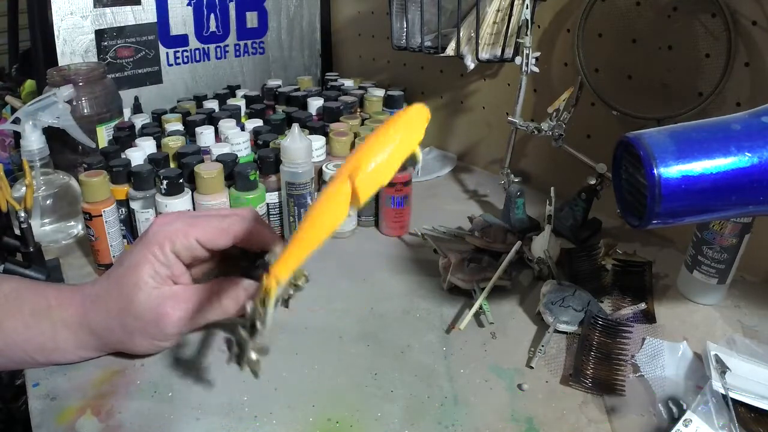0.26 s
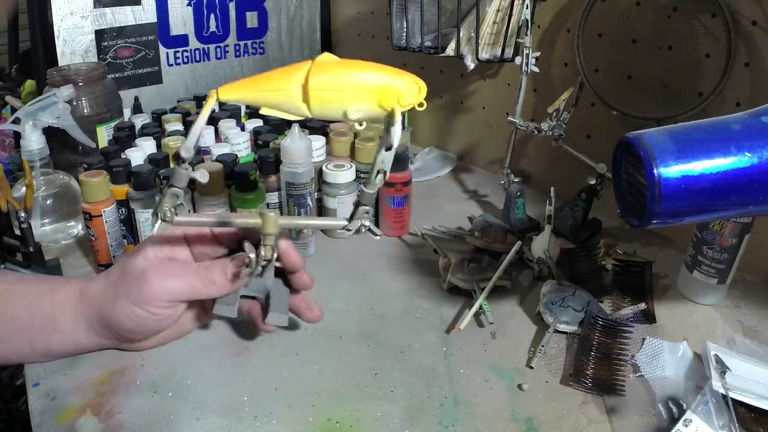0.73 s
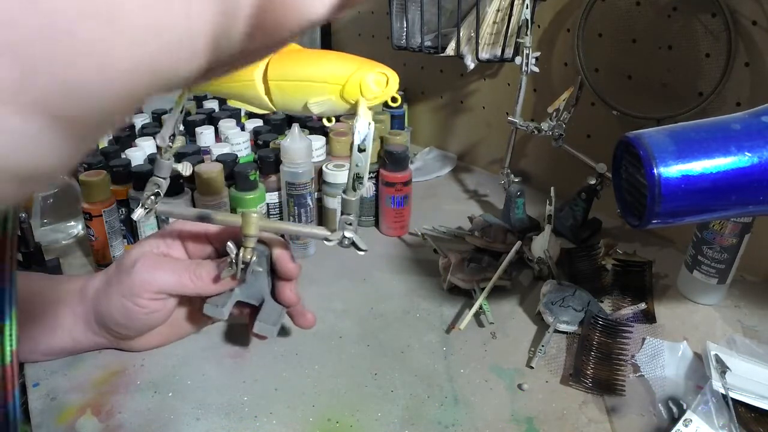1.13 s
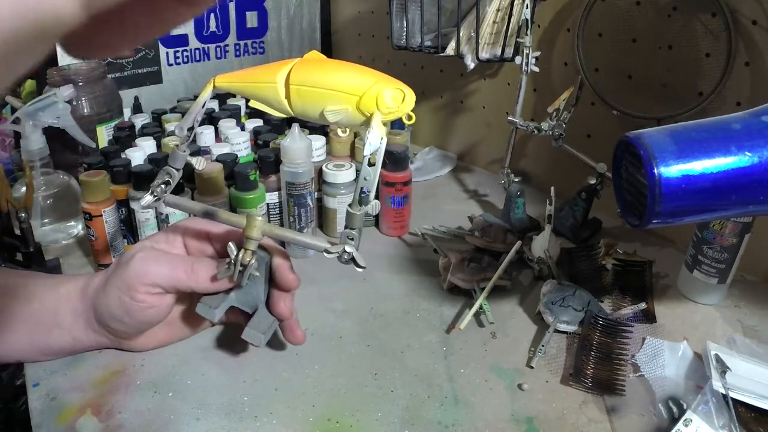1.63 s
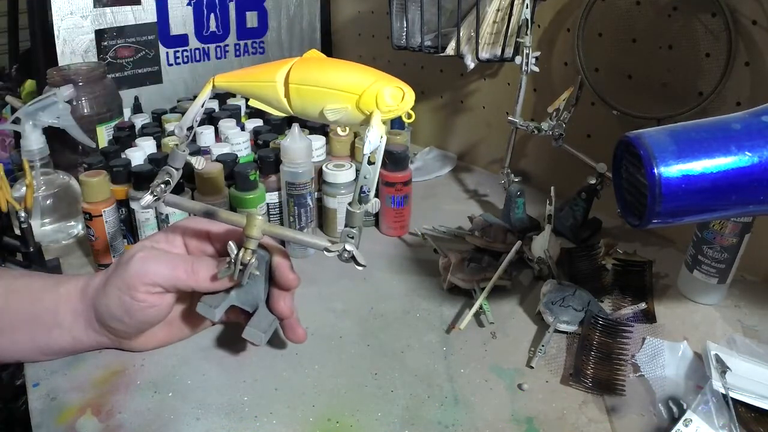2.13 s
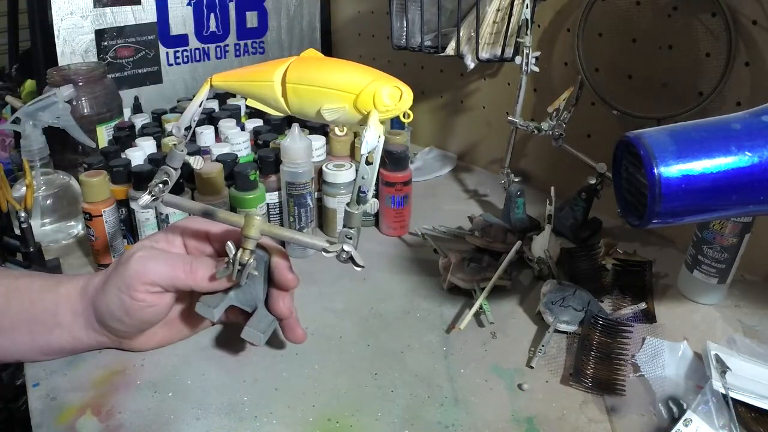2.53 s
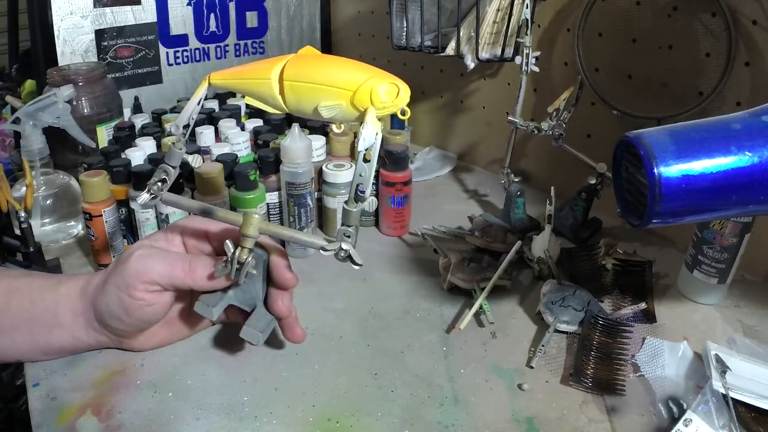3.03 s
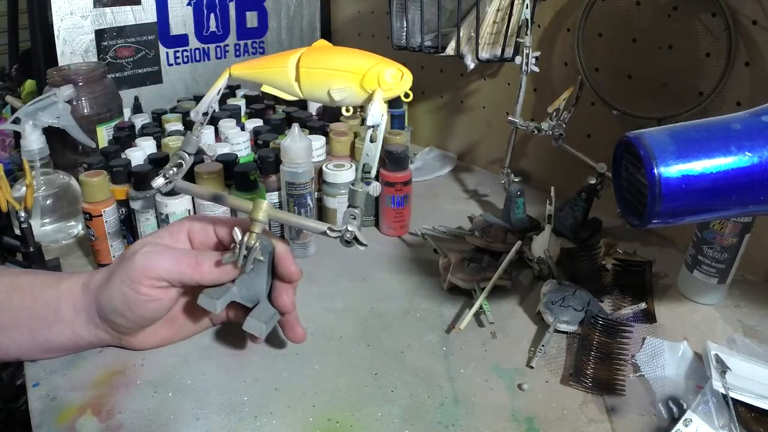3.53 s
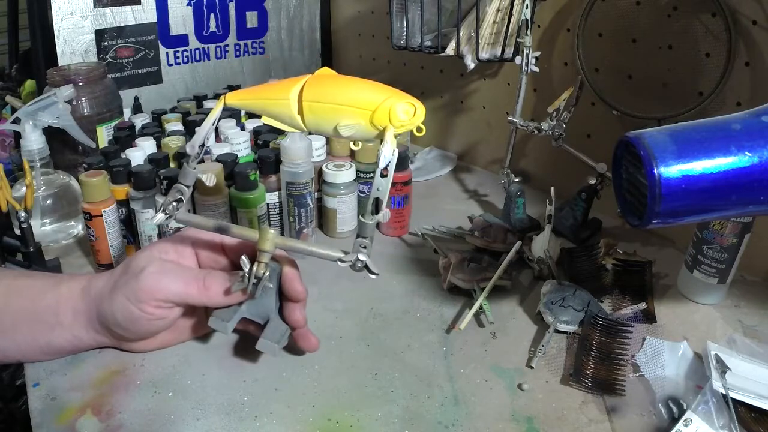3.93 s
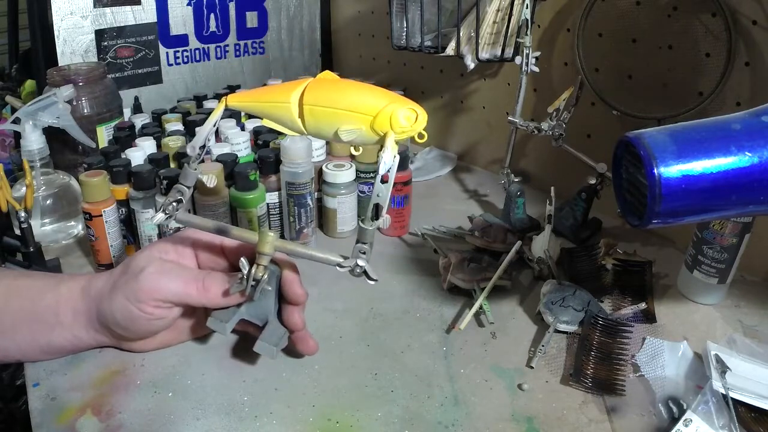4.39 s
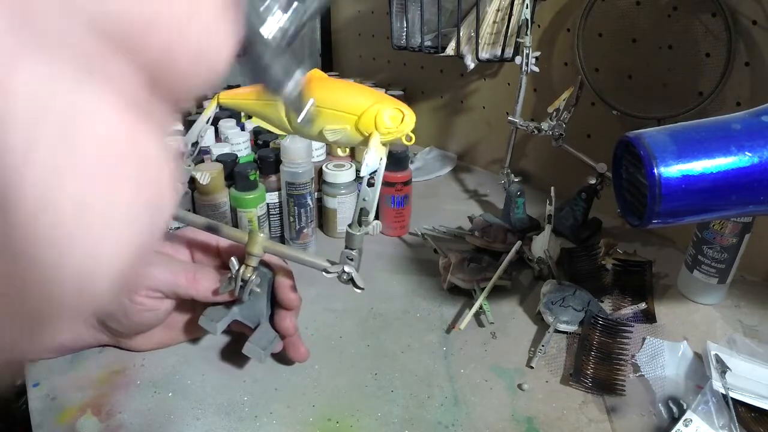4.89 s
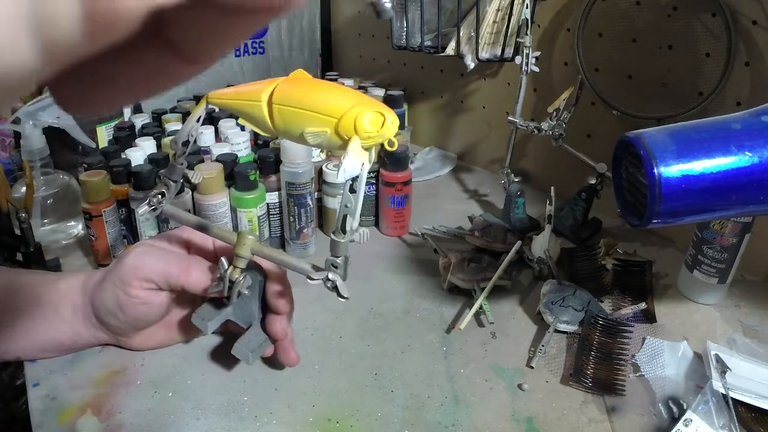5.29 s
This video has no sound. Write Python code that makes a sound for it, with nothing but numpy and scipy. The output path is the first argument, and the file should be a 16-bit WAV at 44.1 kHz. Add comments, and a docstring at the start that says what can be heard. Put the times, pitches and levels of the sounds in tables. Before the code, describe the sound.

Bright, sputtering paint spray starts and stops sharply in a small room, with metallic clamp clicks and brief rough whooshes.

```python
"""The last instant of a spray burst and the click of its trigger, then three more airbrush bursts over a workbench.
Air is shaped noise; paint adds brighter noise, pulsed by spits that start fast and settle near 90 a second.
The trigger snaps shut after the first three bursts as a burst of noise and ringing modes, and the clamp ticks as
it is turned. The jet twice sweeps over something close, as short rough whooshes with an edge tone.
A small room with a steady low rumble, heard by one microphone; now and then the midrange dips for an instant."""
import sys
import numpy as np
from scipy import signal
from scipy.fft import rfft, irfft, next_fast_len
from scipy.io import wavfile
from scipy.ndimage import map_coordinates

SR = 44100
rng = np.random.default_rng(int(sys.argv[2]) if len(sys.argv) > 2 else 0)


def transcribe(u):
    """Save the signal u as a 16-bit wav file named by the first command-line argument.

    u: samples, shape (n,) or (channels, n), limited to [-1, 1]; the rate is SR.
    q: integer samples, one column per channel.
    """
    v = np.clip(np.atleast_2d(u).T, -1, 1)
    q = np.round(v * 32767).astype(np.int16)
    wavfile.write(sys.argv[1], SR, q)


N = 244755  # length [samples]


def amp(db):
    """Decibels to gain."""
    return 10 ** (np.asarray(db) / 20)


def unit(x):
    """Scaled to rms 1."""
    return x / np.sqrt(np.mean(x ** 2) + 1e-20)


def along(points, hz):
    """(frequency, value) points read on a log frequency axis."""
    f, v = np.transpose(points)
    return np.interp(np.log(hz + 1), np.log(f), v)


def curves(rows):
    """One value per sample for each column after the time."""
    s, *columns = np.transpose(rows)
    return [np.interp(np.arange(N) / SR, s, column) for column in columns]


def filtered(x, response):
    """x times a gain that depends on frequency."""
    size = next_fast_len(len(x) + 8192)
    spectrum = rfft(x, size) * response(np.fft.rfftfreq(size, 1 / SR))
    return irfft(spectrum, size)[:len(x)]


def wobble(rate):
    """A smooth random curve, rate knots a second."""
    knots = rng.standard_normal(int(N * rate / SR) + 4)
    return map_coordinates(knots, [np.arange(N) * rate / SR])


def swell(s, spread):
    """A bell-shaped gain around a moment."""
    return np.exp(-((np.arange(N) / SR - s) / spread) ** 2 / 2)


SHUT_DB_PER_S = 2200  # how fast air and mist are shut off


def held(start, end, rise):
    """Gain that rises at a steady dB per second up to the start, holds at 1 and is shut off after the end."""
    t = np.arange(N) / SR
    opening_db = -abs(rise) * np.maximum(start - t, 0)
    closing_db = -SHUT_DB_PER_S * np.maximum(t - end, 0)
    return amp(opening_db + closing_db)


def rush(spectrum, peaks=(), tilt_db=0):
    """Noise of rms 1 with a broad colour, resonant peaks and a tilt per octave."""
    def colour(hz):
        bumps = sum(db / (1 + (2 * (hz - centre) / width) ** 2) for centre, width, db in peaks)
        return amp(along(spectrum, hz) + bumps + tilt_db * np.log2(hz + 1))
    return unit(filtered(rng.standard_normal(N), colour))


def clicks(events, modes, colour, crack_t60, crack_db, scrape_db, level_db):
    """Each contact is a crack, a short scrape and a ring, coloured around its own centre; the grip damps the ring."""
    out, t = np.zeros(N + SR), np.arange(SR // 4) / SR
    for s, db, centre, width, ring_db, pitch, length in events:
        ring = 0
        for hz, mode_db, t60 in modes:
            # every mode is struck a little differently
            decay_db = ring_db + mode_db + rng.standard_normal() - 60 * t / (length * t60)
            ring = ring + amp(decay_db) * np.sin(2 * np.pi * (pitch * hz * t + rng.random()))
        crack = amp(crack_db - 60 * t / crack_t60)
        scrape = amp(scrape_db - 60 * t / 0.048)
        struck = ring + (crack + scrape) * rng.standard_normal(len(t))
        band = lambda hz: colour(np.log2((hz + 1) / centre) / width)
        out[round(s * SR):][:len(t)] += amp(db + level_db) * unit(filtered(struck, band))
    return out[:N]


# broad colour of the rumble: (frequency [Hz], relative level [dB])
RUMBLE_COLOUR = [(12, -50), (25, -8), (48, -0.5), (75, -3), (130, -7), (230, -13), (450, -17), (850, -21.5),
                 (1700, -25), (3000, -31.3), (4800, -34.7), (7200, -40.5), (15000, -54.5)]
RUMBLE_DB, RUMBLE_WAVER_DB = -52.0, .6  # the room's rumble is nearly steady


def rumble():
    """Low-weighted noise with two narrow hums in it and a slight waver of level."""
    hums = [(46.2, 1, 0.97), (128.0, 3.4, 2.2)]  # (centre [Hz], width [Hz], height [dB])
    return amp(RUMBLE_DB + RUMBLE_WAVER_DB * wobble(7.2)) * rush(RUMBLE_COLOUR, hums)


# how long the diffuse tail rings: (frequency [Hz], t60 [s])
ROOM_DECAY = [(200, 0.79), (3000, 0.26), (8000, 0.27), (15000, 0.25)]


def room(x, wet_db, near_db):
    """The bench and shelves answer within milliseconds, with a short diffuse tail."""
    hz, t, z = signal.stft(rng.standard_normal(SR // 2), SR, nperseg=256)
    decay = amp(-60 * t / along(ROOM_DECAY, hz)[:, None])
    tail = signal.istft(z * decay, SR, nperseg=256)[1]
    lag = np.arange(len(tail)) / SR
    near = rng.standard_normal(len(tail)) * amp(-60 * lag / .06) * (lag > .001)
    answer = amp(wet_db) * tail / np.linalg.norm(tail) + amp(near_db) * near / np.linalg.norm(near)
    return x + signal.fftconvolve(x, answer)[:N]


# brief dips of the midrange: (time [s], half length [s], gain at the bottom [dB], upper edge [Hz])
MIDRANGE_DIPS = [(2.333, .008, -15, 5000), (2.861, .007, -13, 5000), (4.358, .012, -6, 3500),
                 (5.232, .008, -10, 2600), (5.446, .023, -40, 4200)]
DIP_LOW_HZ = 193  # the rumble below this carries on


def dipped(x):
    """The midrange dips briefly, leaving the rumble and the top of the hiss."""
    t = np.arange(N) / SR
    for s, half, depth_db, top_hz in MIDRANGE_DIPS:
        band = lambda hz: (1 - 1 / (1 + (hz / DIP_LOW_HZ) ** 8)) / (1 + (hz / top_hz) ** 12)
        window = np.exp(-((t - s) / half) ** 12)
        x = x - filtered(x, band) * (1 - amp(depth_db)) * window
    return x


# colour of the arm's stirred air: (frequency [Hz], relative level [dB])
ARM_COLOUR = [(25, -22), (65, 3.5), (130, -5), (220, -11), (600, -46)]
ARM_S, ARM_SPREAD_S, ARM_DB = 1.3, 0.32, -55


def arm():
    """The arm moves past the microphone and stirs the air: a soft low swell of noise."""
    return amp(ARM_DB) * swell(ARM_S, ARM_SPREAD_S) * rush(ARM_COLOUR)


# soft rustles of the hand on the clamp: (time [s], level [dB], bell spread [s])
HAND_RUSTLES = [(0.135, -59, .017), (0.501, -58, .012), (0.805, -61, 0.02)]
# their colour: (frequency [Hz], relative level [dB])
RUSTLE_COLOUR = [(300, -18), (1000, 5), (3000, 6), (6000, -9), (9000, -26), (15000, -30)]


def rustles():
    """The hand rubs softly on the clamp: faint swells of midrange noise."""
    return sum(amp(db) * swell(s, spread) for s, db, spread in HAND_RUSTLES) * rush(RUSTLE_COLOUR)


# the clamp and airbrush knock and tick: (time [s], level before the overall trim [dB],
# centre [Hz], bandwidth [octaves], ring level [dB], ring length [ratio])
CLAMP_TICKS = [(0.589, -43, 5000, .4, -6, .3), (0.698, -45, 4400, .7, -10, 0.28),
               (0.733, -36.5, 3700, 1, -4, 0.75), (0.7422, -49, 6800, .4, 18, .8),
               (0.7639, -40, 3700, .8, -13, .3), (0.772, -41, 4200, .7, -12, .3),
               (0.783, -34, 5100, .7, -2, .9), (0.7915, -43, 4400, .7, -9, .3),
               (0.798, -42, 6800, .5, 18, 1), (0.8836, -44, 2800, .5, -22, 0.33),
               (0.8963, -32.5, 6500, .45, 10, 0.22), (1.007, -44, 4460, .8, -4, 0.33),
               (1.013, -45, 4500, .8, -3, .3), (1.031, -47, 5500, 1, 2, .8),
               (1.8222, -33, 1100, 1.3, -27, 0.28), (3.9036, -27.5, 5300, .4, 5, 0.44),
               (3.944, -35, 5800, .4, -8, .4)]
# ringing modes of the metal: (frequency [Hz], relative level [dB], t60 before the length ratio [s])
METAL_MODES = [(2570, 18, 0.005), (5300, 6, 0.008), (6450, 5, 0.012), (7030, -2, 0.17), (11000, -14, 0.033),
               (13800, -10, 0.03)]
TICK_CRACK_T60 = .0055  # how soon the crack dies [s]


def clamp():
    """Metal contacts crack and ring, heard through a band around each tick's centre."""
    contacts = [(s, db, hz, width, ring_db, 1, length) for s, db, hz, width, ring_db, length in CLAMP_TICKS]
    muffled = lambda widths: 1 / (1 + widths ** 4)
    return clicks(contacts, METAL_MODES, muffled, TICK_CRACK_T60, crack_db=9, scrape_db=-24, level_db=-29.0)


# the trigger snaps shut: (time [s], level before the overall trim [dB], favoured pitch [Hz], ring pitch [ratio])
TRIGGER_SNAPS = [(0.0575, -24, 4570, 1.02), (3.2835, -24, 5450, .97), (4.6067, -29.5, 8500, 1.0)]
# ringing modes of the valve: (frequency before the pitch ratio [Hz], relative level [dB], t60 [s])
VALVE_MODES = [(1650, -15, .025), (2230, -14, .025), (3750, -2, .014), (4100, -3, .014), (4580, -3, .014),
               (5550, 1, .015), (5900, -3, .012), (7950, -8, .012), (8550, -3, .014), (9150, -6, .014),
               (12400, -8, .016), (13800, -7, .014), (14800, -5, .014)]
SNAP_RING_DB, SNAP_CRACK_DB, SNAP_CRACK_T60 = 6, 7, .008  # ring and crack; how soon the crack dies [s]
SNAP_FOCUS_DB, SNAP_FOCUS_OCTAVES = 6, .15  # boost at the favoured pitch, and its half width
REBOUND_S, REBOUND_DB, REBOUND_HZ, REBOUND_RING_DB = 0.0042, -7, 4000, 1  # softer and duller


def trigger():
    """The sprung trigger snaps shut with a broad, bright click and rebounds once."""
    snaps, rebounds = [], []
    for s, db, hz, pitch in TRIGGER_SNAPS:
        snaps.append((s, db, hz, SNAP_FOCUS_OCTAVES, SNAP_RING_DB, pitch, 1))
        rebounds.append((s + REBOUND_S, db + REBOUND_DB, REBOUND_HZ,
                         SNAP_FOCUS_OCTAVES, REBOUND_RING_DB, pitch, 1))

    def bright(widths):
        low_cut = 1 + (np.minimum(widths, 0) / 11) ** 4
        return amp(SNAP_FOCUS_DB / (1 + widths ** 2)) / low_cut
    return clicks(snaps + rebounds, VALVE_MODES, bright, SNAP_CRACK_T60,
                  crack_db=SNAP_CRACK_DB, scrape_db=-20, level_db=-27.0)


# the jet crosses an obstacle: (time [s], level [dB], bell spread [s], tilt [dB per octave], edge tone [Hz])
JET_SWEEPS = [(4.247, -43.5, 0.029, -1.5, 2310), (4.248, -42.5, 0.013, -1.5, 2350),
              (4.441, -35, 0.011, 7, 4740), (4.462, -40.5, 0.025, 1, 2600), (4.48, -33.5, 0.01, 11.5, 3200),
              (4.544, -52.5, 0.029, 6, 3900)]
# broad colour of the broken jet: (frequency [Hz], relative level [dB])
SPLASH_COLOUR = [(100, -50), (300, -29), (480, 0), (750, -3), (1200, -6), (1700, 0), (3200, 3.5), (4700, 8),
                 (5900, -4), (6600, -8), (8200, -8), (11000, -26), (15000, -23)]
# resonances of the air pocket at the obstacle: (centre [Hz], width [Hz], height [dB])
POCKET_PEAKS = [(1120, 130, 12), (1750, 550, 11.5), (2480, 120, 3), (3080, 220, 9), (3960, 200, 4),
                (4440, 300, 2.5), (5780, 160, 12)]
EDGE_WIDTH_HZ, EDGE_DB = 150, 9  # the edge tone that colours each sweep
SWEEP_FLUTTER_DB, SWEEP_FLUTTER_RATE = 2.4, 700  # roughness, and its random knots per second


def sweeps():
    """Where the jet crosses an edge it breaks into a short, rough whoosh with a resonance of its own."""
    whoosh = 0
    for s, db, spread, tilt_db, edge_hz in JET_SWEEPS:
        peaks = POCKET_PEAKS + [(edge_hz, EDGE_WIDTH_HZ, EDGE_DB)]
        whoosh = whoosh + amp(db) * swell(s, spread) * rush(SPLASH_COLOUR, peaks, tilt_db)
    return whoosh * amp(SWEEP_FLUTTER_DB * wobble(SWEEP_FLUTTER_RATE))


# spits per second as the mist comes on, and once settled
SPIT_START_HZ, SPIT_STEADY_HZ = 152, 88.05
SPIT_SETTLE_S = .25


def spits(age, jitter, scatter_db, build, fall):
    """Spray power, mean 1: paint gathers on the needle and tears off, ever slower until the rate settles."""
    rate = SPIT_STEADY_HZ + (SPIT_START_HZ - SPIT_STEADY_HZ) * np.exp(-age / SPIT_SETTLE_S)
    starts = np.flatnonzero(np.diff(np.floor(np.cumsum(rate) / SR)))
    shift, size = rng.standard_normal((len(starts), 2)).T
    where = np.clip(starts + shift * jitter * SR, 0, N - 1).astype(int)
    impulses = np.bincount(where, amp(scatter_db * size) ** 2, N)
    t = np.arange(-SR // 100, SR // 100) / SR
    shape = np.exp(np.where(t < 0, t / build, -t / fall))
    # dividing by the rate keeps fast spits from being louder
    power = np.abs(signal.fftconvolve(impulses, shape, 'same')) / rate
    return power / power.mean()


# paint mist sounds in these spans; at 4.22-4.28 s the mist thins for a moment under the whoosh:
# (start [s], end [s], starting mist level [dB], fade [dB per s], sputter depth [0-1])
MIST_SPANS = [(0.0, 0.019, -37.5, 0, 0), (1.469, 3.258, -34.5, 1.84, 0.66), (3.905, 4.217, -44, 13, 0.5),
              (4.284, 4.582, -49, -6, 0.2), (5.2, 5.55, -42, 3.5, 0.65)]
# the finger wavers through the long span, heard relative to the mean: (time [s], level [dB])
FINGER_WAVER = [(1.52, -38.5), (2.3, -41), (2.902, -37), (3.18, -40)]
# a gob of paint leaves the needle in a spurt: (time [s], level [dB], bell spread [s])
PAINT_SPURTS = [(0.017, -34.5, 0.0066), (4.57, -35.5, 0.0076), (5.234, -34, 0.016), (5.269, -34, 0.0078)]
MIST_RISE_DB_PER_S = 692  # how fast the mist comes on


def paint_flow():
    """Mist strength, sputter depth and time since the mist last came on: spans drift in level and stop."""
    t = np.arange(N) / SR
    flow, depth, age = np.zeros((3, N))
    for start, end, db, fade, sputter in MIST_SPANS:
        since = np.maximum(t - start, 0)
        span_db = db - fade * np.minimum(since, end - start)
        flow += amp(span_db) * held(start, end, MIST_RISE_DB_PER_S)
        depth = np.where(t >= start, sputter, depth)
        age = np.where(t >= start, since, age)
    s, level_db = np.transpose(FINGER_WAVER)
    waver_db = np.interp(t, s, level_db - level_db.mean())
    flow *= amp(waver_db * held(s[0], s[-1], MIST_RISE_DB_PER_S))
    spurts = sum(amp(db) * swell(moment, spread) for moment, db, spread in PAINT_SPURTS)
    return np.hypot(flow, spurts), np.clip(depth, 0, 1), age


# the trigger is pressed and air flows; a light press only leaks:
# (fully open [s], released [s], hiss level [dB], rise [dB per s])
AIR_BURSTS = [(0.0, 0.025, -41.5, 1005.5), (1.415, 3.266, -46, 265), (3.758, 4.586, -46.5, 800),
              (5.002, 5.05, -59, 195), (5.041, 5.543, -45, 1300)]
# colours of dry air, atomised paint and the jet's low buffeting: (frequency [Hz], relative level [dB])
AIR_COLOUR = [(300, -1), (900, -8.5), (2300, -0.5), (3200, 1), (4000, 1.5), (6200, 1.5), (8500, 2),
              (11500, 2.5), (13500, 4.5), (15300, 2.5)]
MIST_COLOUR = [(400, -36), (900, -32), (1700, -15), (2700, -14), (3900, -5), (5200, -1), (6400, 0.5),
               (7500, -0.5), (9000, -2.5), (10300, -2), (11400, 3.5), (13000, 2.5), (14700, 5),
               (15300, 0.5)]
BUFFET_COLOUR = [(40, -34), (90, -4), (140, 0), (220, 6), (300, -2.5), (500, -4.5), (900, -10.5),
                 (2000, -32), (5000, -17.5)]
# narrow peaks of the nozzle's hiss: (centre [Hz], width [Hz], height [dB])
NOZZLE_PEAKS = [(3120, 130, 2), (3740, 100, 1), (4300, 110, 2), (5820, 200, 2.5), (6500, 190, 2.5),
                (7770, 220, -0.5), (7800, 610, 0.5), (11440, 180, -2)]
# as the nozzle is aimed and moved: (time [s], change of buffeting [dB], change of the top of the hiss [dB])
NOZZLE_AIM = [(1.45, -4, 1.5), (1.8, 0, 0.5), (2.35, 4.5, 1.5), (2.7, 0, 1), (3.15, 5.5, 0), (3.9, 2, -2),
              (4.5, -4, -0.5), (5.3, -8, 0.5)]
BEAM_HZ = 10700  # above this the hiss leaves the nozzle in a narrow beam


def airbrush(buffet_db, waver_db, gust_db):
    """The open valve gives a smooth hiss; paint makes it brighter and pulsing; the jet buffets what it hits."""
    air_flow = sum(amp(db) * held(start, end, rise) for start, end, db, rise in AIR_BURSTS)
    paint, depth, age = paint_flow()
    aim_db, beam_db = curves(NOZZLE_AIM)
    spray_power = spits(age, jitter=.0005, scatter_db=1.4, build=.0015, fall=.0007)
    pulsing = np.sqrt(1 - depth + depth * spray_power)
    air = air_flow * rush(AIR_COLOUR, NOZZLE_PEAKS)
    mist = paint * pulsing * rush(MIST_COLOUR, NOZZLE_PEAKS)
    hiss = air + mist
    beam = filtered(hiss, lambda hz: 1 - 1 / (1 + (hz / BEAM_HZ) ** 10))
    aimed_hiss = hiss + (amp(beam_db) - 1) * beam
    gusts = amp(buffet_db + aim_db + gust_db * wobble(12))
    buffet = np.hypot(air_flow, paint) * gusts * rush(BUFFET_COLOUR)
    return amp(waver_db * wobble(24.31)) * aimed_hiss + buffet


def scene():
    """Spray, clicks and handling in the room, over its rumble; both channels alike."""
    spray = airbrush(buffet_db=-22.5, waver_db=0.2, gust_db=3.0)
    handling = clamp() + rustles() + arm()
    sound = room(spray + sweeps() + trigger() + handling, wet_db=-13.5, near_db=-10.5)
    mono = dipped(sound + rumble())
    return np.array([mono, mono])


TOP_HZ = 15400  # centre of the band limit's slope


def record(dry):
    """The treble is rolled off to nothing across a narrow slope at the band limit."""
    edge = lambda hz: np.clip((TOP_HZ - hz) / 300 + .5, 0, 1) ** 2
    return np.array([filtered(channel, edge) for channel in dry])


dry = scene()
out = record(dry)
transcribe(out)
```